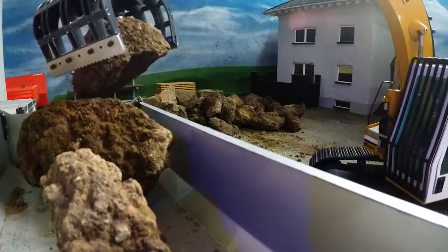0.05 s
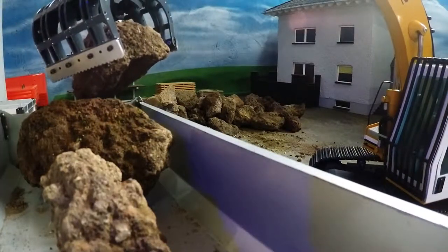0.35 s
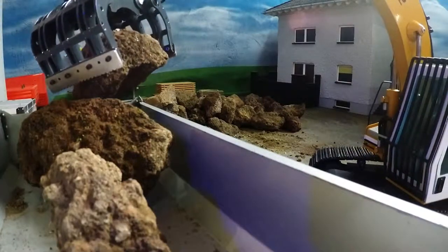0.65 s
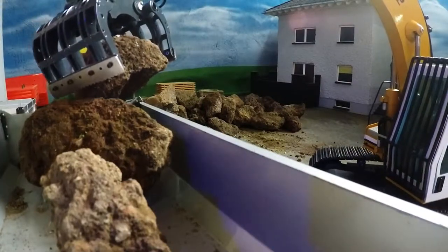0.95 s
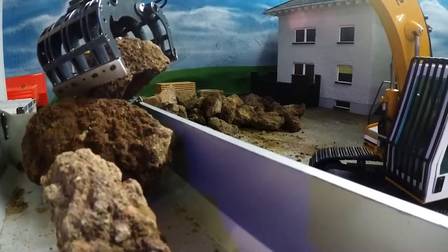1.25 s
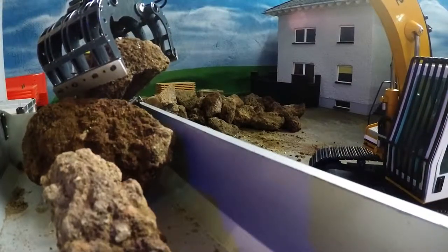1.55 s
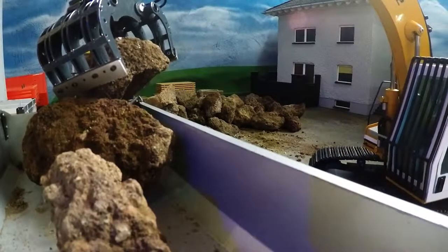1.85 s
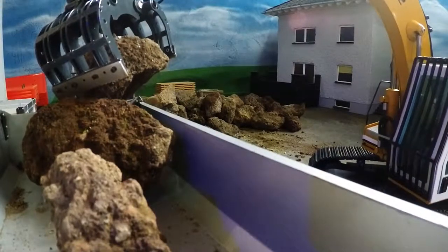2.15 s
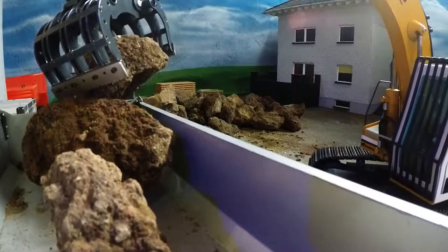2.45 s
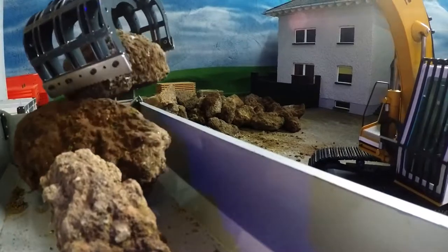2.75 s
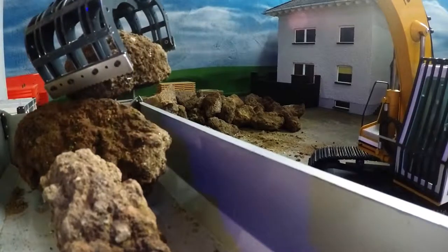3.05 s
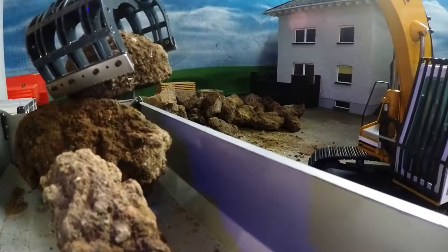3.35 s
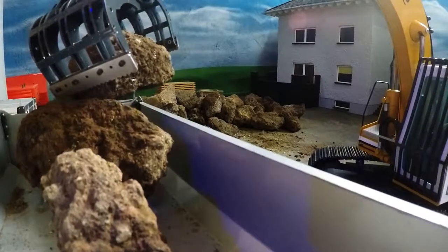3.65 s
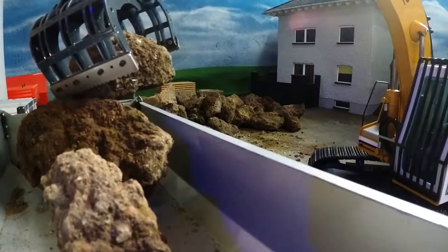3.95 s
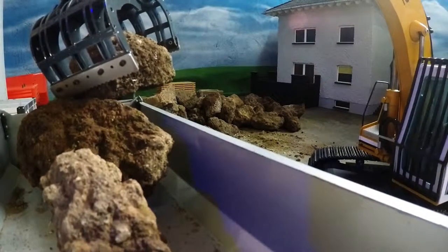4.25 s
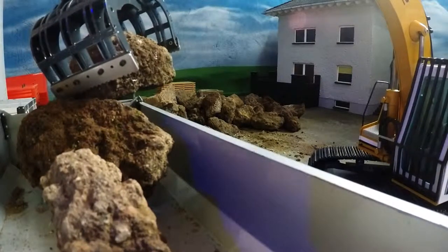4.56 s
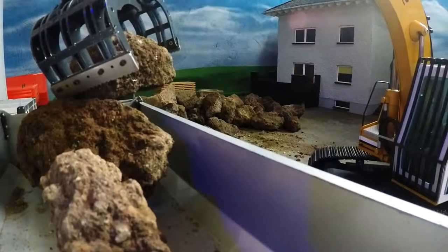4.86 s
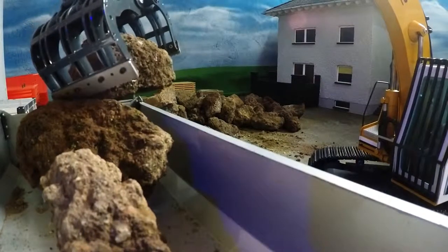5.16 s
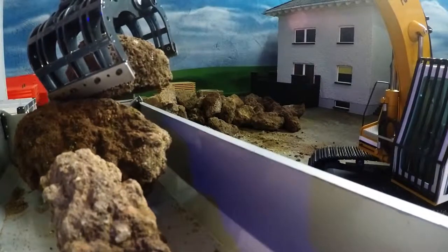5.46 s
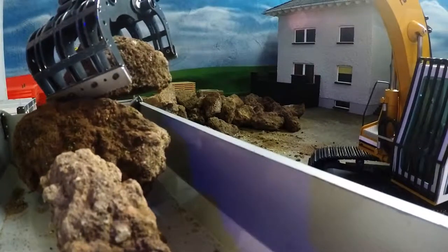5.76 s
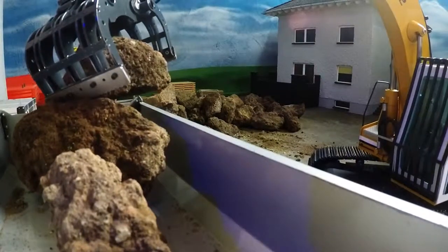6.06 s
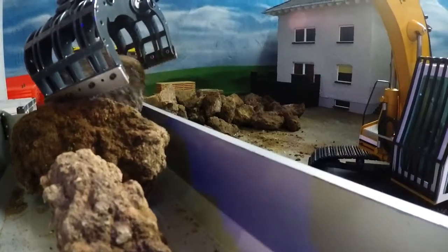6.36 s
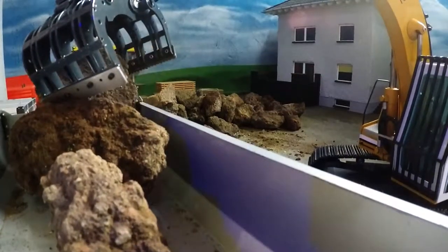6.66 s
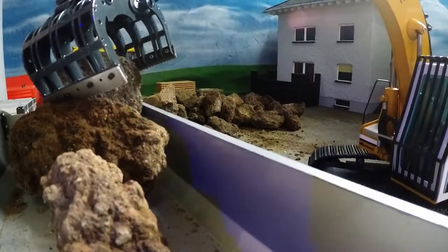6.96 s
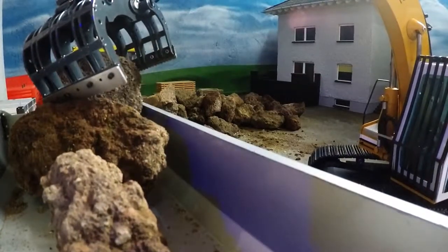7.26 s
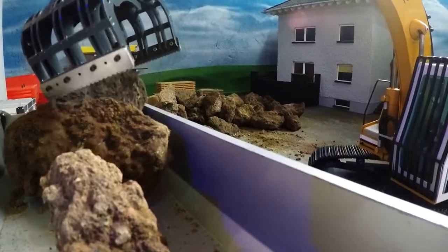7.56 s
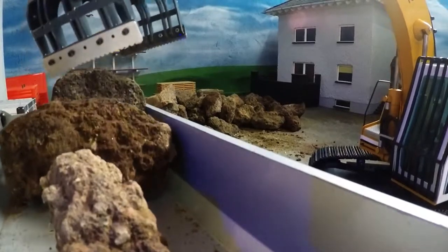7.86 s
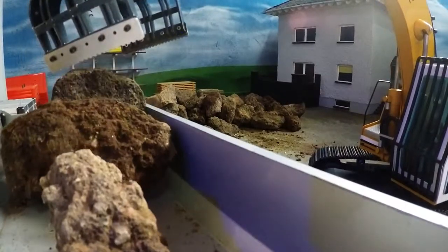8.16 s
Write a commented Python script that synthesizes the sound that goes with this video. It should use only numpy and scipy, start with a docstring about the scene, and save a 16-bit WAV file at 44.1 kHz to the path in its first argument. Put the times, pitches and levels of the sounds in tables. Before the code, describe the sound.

A model excavator's hydraulic pump hums and whines steadily indoors. Its steel grab lowers a stone into a tipper bed with light knocks, then a sharper crunch and clink. Two faint hisses of oil follow. In the last part, stones strike and scrape loudly against each other, the grab rings and the bed bounces with low booms. The microphone sits on the bed, and the hardest blows briefly overload it.

```python
"""Stones knock and crunch in a tipper bed over the steady hum of a hydraulic pump.
A model excavator sets a stone down: its steel grab scrapes and rings, the stones strike each other
and the bed, which rocks on its springs. Oil spurts hiss through a valve.
The microphone rides on the bed: the hardest blows overload it and duck its gain, which creeps back."""
import sys
import numpy as np
from scipy import signal
from scipy.fft import rfft, irfft
from scipy.io import wavfile

SR = 44100
rng = np.random.default_rng(int(sys.argv[2]) if len(sys.argv) > 2 else 0)


def log_audio(samples):
    """Write samples as a 16-bit WAV file to the path given in sys.argv[1]."""
    # one column per channel
    frames = np.atleast_2d(samples).T
    # limit to full scale, then quantise
    limited = np.clip(frames, -1, 1)
    pcm = np.round(limited * 32767).astype(np.int16)
    wavfile.write(sys.argv[1], SR, pcm)


N = 370881
TIME = np.arange(N) / SR

# Stone knocks. Each row: start in seconds, crunch length in seconds, strength in dB, heft in dB.
# Heft sends a blow into the bed (+, dull) or keeps it in the stones (-, bright).
BLOWS = [(0.809, .007, -36.5, 2.5), (0.898, 0.0066, -50.5, -2.5), (1.12, 0.0035, -51.5, -2),
         (2.138, 0.0072, -52, -1.5), (2.312, .006, -56.5, -5), (2.676, 0.007, -46.5, -7),
         (2.706, 0.0042, -28.5, -8.5), (2.757, 0.0071, -21, 0), (5.146, .011, -42.5, 9.5),
         (5.223, 0.0036, -47.5, 10.5), (5.627, 0.0068, -33, 6), (5.884, 0.0032, -56, 1.5),
         (6.172, .008, -33, 6.5), (6.232, 0.0045, -10.5, -3), (6.254, 0.0063, -32, -7.5),
         (6.32, 0.0071, -28, -5.5), (6.379, 0.005, -30.5, -1), (6.41, 0.0071, -19, -4.5),
         (6.903, 0.0053, -17, -1.5), (6.94, 0.011, -30.5, -1.5), (7.447, 0.0037, -32, -1.5),
         (7.549, .008, -18, -0.5), (7.582, 0.011, -9, -2.5), (7.651, 0.0077, -15.5, 1),
         (7.711, 0.0077, -14, -2.5), (7.811, 0.0044, -47.5, -8.5), (7.891, 0.0049, -52, -7),
         (7.929, 0.0046, -43.5, -7.5), (8.17, 0.013, -42.5, 4.5)]


def stones(grain_db=3.5, clump_db=1.0, rattle_db=-26, rattle_t60_s=0.3, crack_share=0.54):
    """Rough stone crushes in a burst of tiny contacts; each burst rings the bed and the stones."""
    # Each row: frequency in Hz, relative level in dB, t60 in seconds.
    panel_modes = [(369, -9.5, 0.067), (550, -12, 0.079), (567.7, 2.5, 0.042), (660, 1.5, 0.037),
                   (766, -17, 0.1)]
    stone_modes = [(894, -9, 0.13), (1095, -14.5, 0.086), (1080, -4, 0.092), (1262, -2.5, 0.016),
                   (1416, 4, 0.039), (1473, 3, 0.046), (1664, 7, 0.029), (1876, -5.5, 0.034),
                   (2140, -13.5, 0.021), (2113, -13, 0.053), (2253, -2.5, 0.03), (2552, 1.5, 0.032)]
    # Each row: frequency in Hz, relative density in dB.
    thud_spectrum = [(40, -9.5), (90, 12), (130, 0.5), (190, -2), (270, -9), (380, -12.5), (520, -22),
                     (1500, -51), (8000, -94.5)]
    crack_spectrum = [(300, -30.5), (800, -20.5), (1050, 1), (1700, 0), (2000, -1.5), (2500, -1),
                      (3000, -19.5), (5000, -28.5), (14000, -58)]
    grit_spectrum = [(1200, -28.5), (2400, 18.5), (3000, 6), (3800, 4.5), (4500, 0), (5200, -4),
                     (7000, -17.5), (10000, -39), (15000, -51)]
    out, t = np.zeros(N), TIME[:SR // 6]
    highpass = signal.butter(2, 750, "high", fs=SR, output="sos")   # small stones radiate no bass

    def onset_rms_one(x):
        """Scale to rms 1 over the first 25 ms."""
        return x / np.sqrt(np.mean(x[:SR // 40] ** 2))

    def steps(hold_samples):
        """Stepped random values."""
        return np.repeat(rng.standard_normal(len(t)), hold_samples)[:len(t)]

    for start_s, crunch_s, strength_db, heft_db in list(BLOWS) + slips():
        crush = (t / crunch_s) ** 1.52 * np.exp(1.5 - 1.48 * t / crunch_s)
        rattle = from_db(rattle_db - 60 * t / rattle_t60_s)
        roughness = from_db(grain_db * steps(20) + clump_db * steps(110))
        force, crumbs = (crush + rattle) * roughness * rng.standard_normal((2, len(t)))
        thud = colour(force, thud_spectrum)
        panel = signal.fftconvolve(force, ringing(panel_modes, t))[:len(t)]
        stone = signal.fftconvolve(force, ringing(stone_modes, t))[:len(t)]
        stone = onset_rms_one(signal.sosfilt(highpass, stone))
        crack = onset_rms_one(colour(crumbs, crack_spectrum))
        clack = np.sqrt(1 - crack_share) * stone + np.sqrt(crack_share) * crack
        grit_pole = np.exp(-2 * np.pi * 50 / crunch_s / SR)   # longer contact, duller grit
        grit = signal.lfilter([1 - grit_pole], [1, -grit_pole], colour(crumbs, grit_spectrum))
        parts = [(thud, strength_db + heft_db),
                 (panel, strength_db + 0.5 * heft_db - 7),
                 (clack, strength_db - heft_db - 1),
                 (grit, 0.94 * (strength_db - heft_db) - 11)]   # light touches are the grittiest
        for part, db in parts:
            add(out, start_s, from_db(db) * onset_rms_one(part))
    return out


def slips(count=5, crunch_s=0.011, spread_db=0.5):
    """Stone drags over stone in uneven slips; returns rows like those of BLOWS."""
    # Each row: start in seconds, length in seconds, strength in dB, heft in dB.
    scrapes = [(1.028, .06, -55.5, -3), (2.738, 0.082, -40, 1), (5.099, .1, -52.5, 5),
               (5.423, 0.27, -61, 10.5), (7.39, .16, -44, 1), (7.611, 0.14, -29, -4.5)]
    rows = []
    for start_s, length_s, db, heft_db in scrapes:
        times_s = start_s + length_s * (np.arange(count) + .5 * rng.random(count)) / count
        rows += [(s, crunch_s, db - spread_db * rng.standard_normal(), heft_db) for s in times_s]
    return rows


def grab(jaw_hz=688, jaw_t60_s=12):
    """Struck steel tines clink and the shells ring on; once empty, a knocked jaw sings at one pitch."""
    # Each row: start in seconds, clink gain in dB, shell ring gain in dB.
    hits = [(2.687, -31, -62), (2.709, -17, -48.5), (6.235, -34.5, -43.5), (6.908, -23.5, -58.5),
            (7.59, -34, -54)]
    # Each row: frequency in Hz, relative level in dB, t60 in seconds.
    tine_modes = [(2698, -4, 0.087), (2589, 5.5, .05), (1110, -3, 0.062), (3547, -27, 0.2)]
    shell_modes = [(571, -3, 3), (1163, 2.5, 1.4), (1410, -14, 1.4), (1440, -10, 1.7)]
    # Each row: start in seconds, level in dB.
    jaw_hits = [(6.233, -53), (7.59, -56.5)]
    out, jaw_energy, t = np.zeros(N), np.zeros(N), TIME[:3 * SR]
    for start_s, clink_db, ring_db in hits:
        add(out, start_s, from_db(clink_db) * ringing(tine_modes, t[:SR // 2]))
        add(out, start_s, from_db(ring_db) * ringing(shell_modes, t))
    for start_s, db in jaw_hits:
        add(jaw_energy, start_s, from_db(db - 60 * t / jaw_t60_s) ** 2)
    return out + np.sqrt(jaw_energy) * np.sin(2 * np.pi * jaw_hz * TIME)


def rocking(rock_hz=44.36, gain_db=-1.14, wobble_db=4.0):
    """The bed bounces on its springs, jolted by each knock; the shifting load bends pitch and level."""
    # Low booms of the bed: the strongest come with stone blows, softer swells between them.
    # Each row: start in seconds, relative level in dB, t60 in seconds.
    bounces = [(.812, -6, .17), (.9, -17, 0.34), (1.086, -9, .47), (1.274, -12.5, 0.74),
               (1.467, -19.5, 0.83), (2.69, -8, 1.06), (3.55, -30, 0.58), (4.221, -33.5, 0.69),
               (5.096, -22, 1.65), (5.44, -23, 1.25), (5.63, -15, 0.67), (6.229, 17, 0.14),
               (6.9, -5.5, 0.74), (7.414, -13.5, 3.3), (7.57, -1, 0.69), (8.179, -18, 0.86)]
    bounce_rise_s = 0.02
    jolt_db, jolt_t60_s, jolt_rise_s = 10.5, 0.53, 0.0078
    swings = [(s, db, t60_s, bounce_rise_s) for s, db, t60_s in bounces]
    swings += [(s, db + jolt_db, jolt_t60_s, jolt_rise_s) for s, _, db, _ in BLOWS]
    energy, t = np.zeros(N), TIME[:2 * SR]
    for start_s, db, t60_s, rise_s in swings:
        rise = 1 - np.exp(-(t / rise_s) ** 2)
        add(energy, start_s, (rise * from_db(db - 60 * t / t60_s)) ** 2)
    cycles = np.cumsum(rock_hz * (1 + .1 * drift(10))) / SR
    return from_db(gain_db + wobble_db * drift(9)) * np.sqrt(energy) * np.sin(2 * np.pi * cycles)


def pump(fan_hz=50.12, whine_db_per_hz=2.6, fade_db_per_s=0.42):
    """The pump's whine grows with speed and slowly fades; fan buzz, whirr and hums join it."""
    # The shaft sags under load. Each row: time in seconds, rotation rate in Hz.
    speed_curve = [(0, 107.8), (.35, 107.3), (.95, 108), (1.12, 107.25), (1.7, 107.3), (2.6, 106.1),
                   (2.9, 107.1), (3.8, 107.25), (4.7, 106.95), (5.0, 107.9), (5.35, 106.8), (5.8, 107.6),
                   (7.2, 107.5), (7.9, 108), (8.41, 106.3)]
    # Gear and motor; cooling fan. Each row: multiple of the shaft rate, base level in dB.
    pump_lines = [(1, -61), (6, -79), (11, -82), (16, -79), (23, -83), (24, -63), (25, -77), (30, -85),
                  (36, -74), (48, -87), (71, -94), (72, -85.5)]
    fan_lines = [(3, -60), (5, -77), (17, -80), (19, -80), (23, -78), (29, -80), (31, -74), (32, -77),
                 (33, -76), (47, -77), (50, -73), (51, -70), (52, -76), (64, -83)]
    shaft_hz = in_time(speed_curve)
    whine_db = -0.05 + whine_db_per_hz * (shaft_hz - shaft_hz.mean()) - fade_db_per_s * TIME
    pump_turns = np.cumsum(shaft_hz + .09 * drift(12)) / SR
    fan_turns = fan_hz * TIME
    whine = from_db(whine_db) * harmonics(pump_lines, pump_turns)
    return whine + harmonics(fan_lines, fan_turns) + whirr(fan_turns) + hums()


def whirr(fan_turns, level_db=-55, throb_depth=0.31, repeat_share=0.19):
    """Pump noise: part repeats with each turn of the fan, the rest throbs at that rate."""
    # Each row: frequency in Hz, relative density in dB.
    spectrum = [(250, 4.5), (450, -4), (590, 6.5), (800, -3.5), (1300, -1), (1650, 2), (2100, -1),
                (2600, 3), (2900, -6), (3250, -0.5), (3600, -7.5), (3950, -0.5), (4700, -13.5), (8000, -25)]
    # Each row: time in seconds, gain in dB.
    gain_curve = [(0, -4.5), (3.3, -3.5), (6.1, -6), (8.41, -4)]
    one_turn = rng.standard_normal(880)
    looped = np.interp(fan_turns % 1, np.linspace(0, 1, len(one_turn)), one_turn)
    buzz = rms_one(colour(looped, spectrum))
    rush = noise(spectrum) * (1 + throb_depth * np.sin(2 * np.pi * fan_turns))
    mix = np.sqrt(repeat_share) * buzz + np.sqrt(1 - repeat_share) * rush
    return from_db(level_db + in_time(gain_curve)) * mix


def hums(waver_db=2.3, waver_hz=3):
    """Faint wavering tones of the machine."""
    # Each row: frequency in Hz, rms level in dB.
    tones = [(175, -72), (573, -70), (620, -78), (8629, -93)]
    out = np.zeros(N)
    for hz, db in tones:
        amplitude = np.sqrt(2) * from_db(db + waver_db * drift(6.7))
        cycles = np.cumsum(hz + waver_hz * drift(11)) / SR
        out += amplitude * np.sin(2 * np.pi * cycles)
    return out


def valve():
    """Spurts of oil hiss through the valve, each swelling and dying away."""
    # Each row: centre in seconds, half length in seconds, level in dB.
    spurts = [(3.61, 0.092, -56.5), (3.852, 0.06, -55)]
    # Each row: frequency in Hz, relative density in dB.
    spectrum = [(1000, 3), (2600, 11.5), (4000, 3.5), (6000, -4), (9000, -11), (13500, -19), (16000, -24.5)]
    flow = sum(from_db(db) * np.exp(-((TIME - s) / half_s) ** 2) for s, half_s, db in spurts)
    return flow * noise(spectrum)


def room(x, t60_s=0.14, cutoff_hz=5000):
    """A short, dull tail of dense reflections."""
    t = TIME[:SR // 2]
    tail = rng.standard_normal(len(t)) * from_db(-60 * t / t60_s) * (t > .008)
    tail = signal.sosfilt(signal.butter(2, cutoff_hz, fs=SR, output="sos"), tail)
    return signal.fftconvolve(x, tail / np.sqrt(np.sum(tail ** 2)))[:N]


def air(level_db=-50):
    """Low, steady noise of the room's air."""
    # Each row: frequency in Hz, relative density in dB.
    spectrum = [(20, -17.5), (40, 3), (65, 4), (110, -9), (170, -23.5), (250, -28), (600, -35), (3000, -49),
                (9000, -50.5), (15000, -74)]
    return from_db(level_db) * noise(spectrum)


def ringing(modes, t):
    """Decaying sines; each strike shares its force out anew among the modes."""
    hz, db, t60_s = np.transpose(modes)[:, :, None]
    strength_db = db + rng.standard_normal(db.shape)
    signs = rng.choice([-1, 1], db.shape)
    return np.sum(signs * from_db(strength_db - 60 * t / t60_s) * np.sin(2 * np.pi * hz * t), axis=0)


def harmonics(lines, turns, flutter_db=1.8):
    """Lines locked to a shaft, each fluttering in level."""
    return np.sqrt(2) * sum(from_db(db + flutter_db * drift(7)) * np.sin(2 * np.pi * multiple * turns)
                            for multiple, db in lines)


def drift(rate_hz):
    """Slow random wander of rms 1."""
    hop, settle = 40, 2000
    pole = np.exp(-2 * np.pi * rate_hz * hop / SR)
    white = rng.standard_normal(N // hop + settle + 2)
    slow = signal.lfilter([1], [1, -2 * pole, pole * pole], white)[settle:]
    return np.interp(np.arange(N) / hop, np.arange(len(slow)), rms_one(slow))


def colour(x, spectrum, size=4096):
    """Minimum-phase filter through (Hz, dB) points."""
    hz, db = np.transpose(spectrum)
    grid_hz = np.maximum(np.arange(size // 2 + 1) * SR / size, 1)
    gain = from_db(np.interp(np.log(grid_hz), np.log(hz), db))
    cepstrum = irfft(np.log(gain))
    cepstrum[1:size // 2] *= 2
    cepstrum[size // 2 + 1:] = 0
    return signal.fftconvolve(x, irfft(np.exp(rfft(cepstrum))))[:len(x)]


def noise(spectrum):
    """Coloured noise of rms 1."""
    return rms_one(colour(rng.standard_normal(N), spectrum))


def from_db(db):
    """Decibels to gain."""
    return np.exp(np.asarray(db) * (np.log(10) / 20))


def rms_one(x):
    """Scale to rms 1."""
    return x / np.sqrt(np.mean(x ** 2) + 1e-20)


def in_time(rows):
    """Interpolate (seconds, value) rows at every sample."""
    return np.interp(TIME, *np.transpose(rows))


def add(out, start_s, x):
    """Mix x into out from start_s on."""
    at = round(start_s * SR)
    out[at:at + len(x)] += x[:N - at]


def scene(room_db=-21):
    """Load, machine and room at one microphone."""
    knocks = stones() + grab()
    return (knocks + pump() + valve() + from_db(room_db) * room(knocks) + rocking() + air())[None]


def record(dry, threshold_db=-8, attack_s=0.0039, release_db_per_s=10.5, ceiling=0.43, cutoff_hz=15300):
    """Gain control ducks after loud blows, what gets past it clips, and the top is cut."""
    excess_db = np.maximum(20 * np.log10(np.abs(dry[0]) + 1e-9) - threshold_db, 0)
    release_db = release_db_per_s * TIME
    held_db = np.maximum.accumulate(excess_db + release_db) - release_db
    pole = np.exp(-1 / (attack_s * SR))
    ducked = dry * from_db(-signal.lfilter([1 - pole], [1, -pole], held_db))
    clipped = ducked / (1 + (ducked / ceiling) ** 10) ** (1 / 10)
    return signal.sosfilt(signal.ellip(10, .2, 80, cutoff_hz, fs=SR, output="sos"), clipped)


dry = scene()
out = record(dry)
log_audio(out)
```